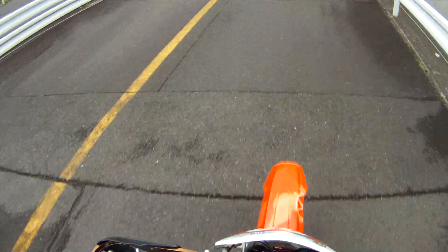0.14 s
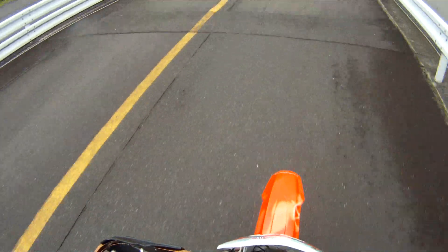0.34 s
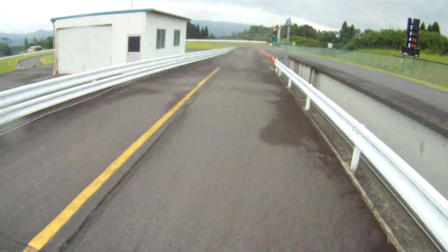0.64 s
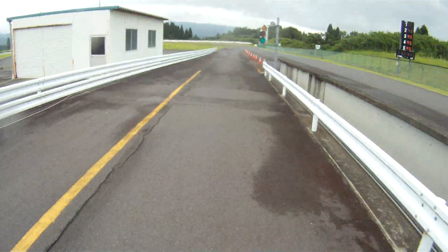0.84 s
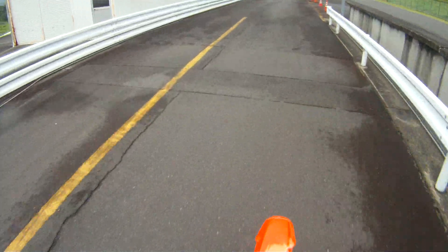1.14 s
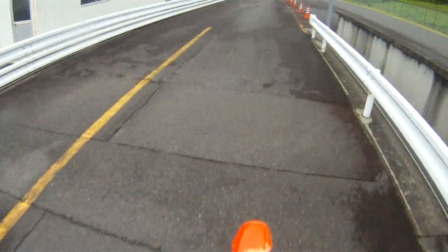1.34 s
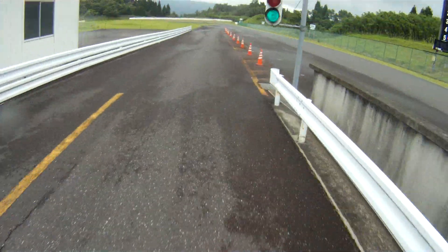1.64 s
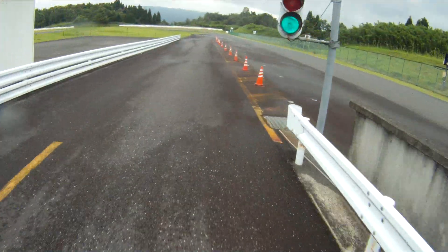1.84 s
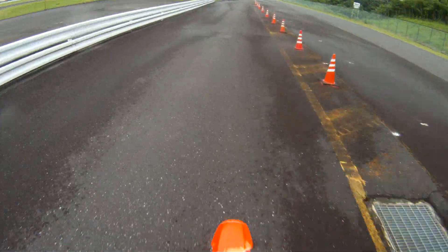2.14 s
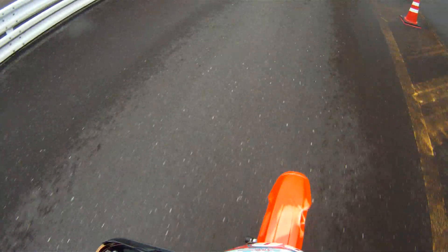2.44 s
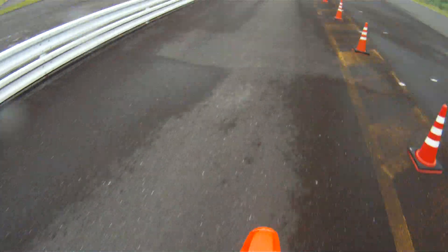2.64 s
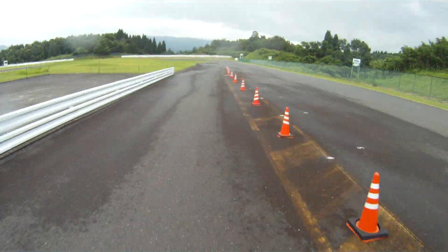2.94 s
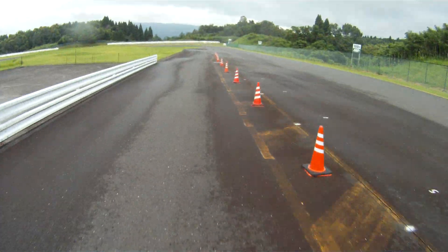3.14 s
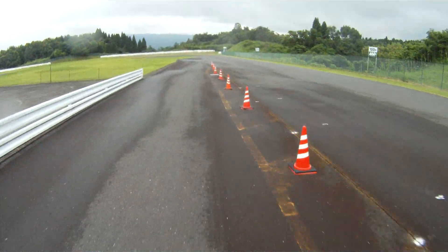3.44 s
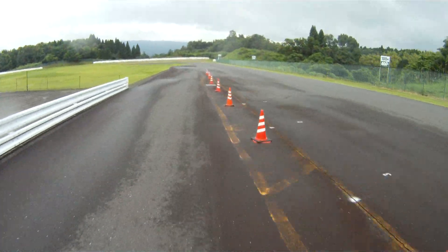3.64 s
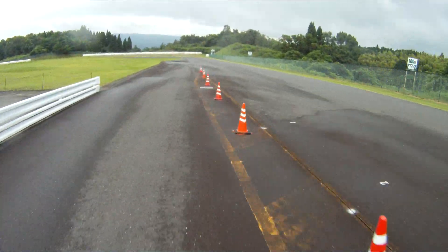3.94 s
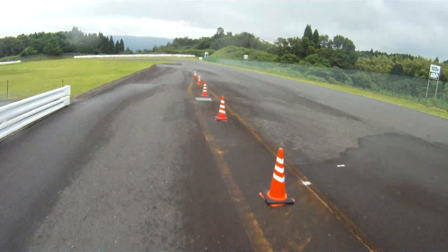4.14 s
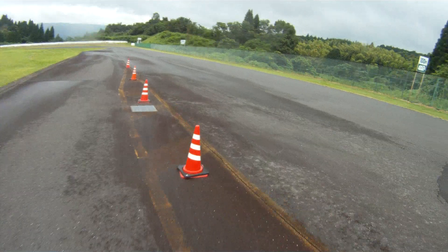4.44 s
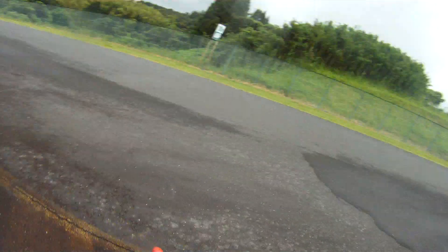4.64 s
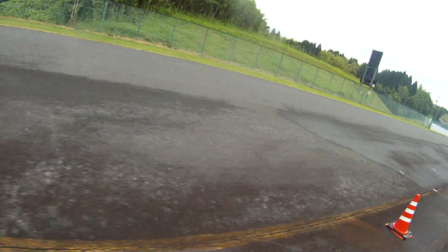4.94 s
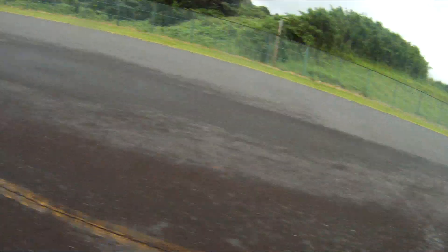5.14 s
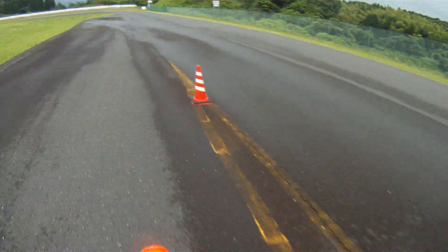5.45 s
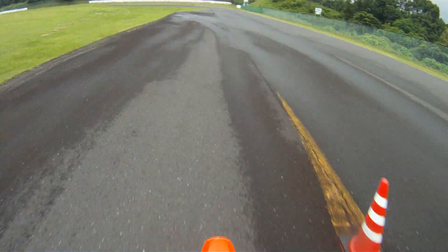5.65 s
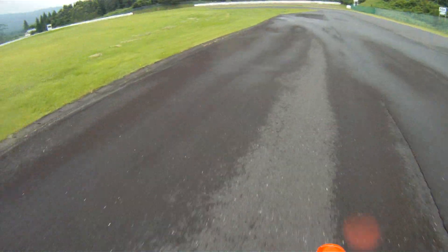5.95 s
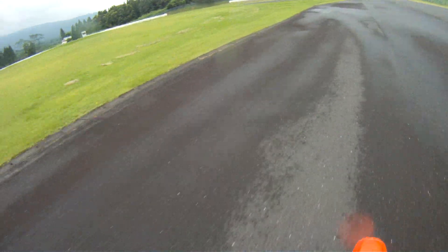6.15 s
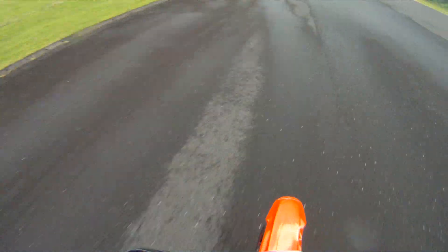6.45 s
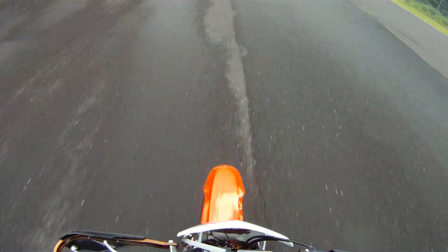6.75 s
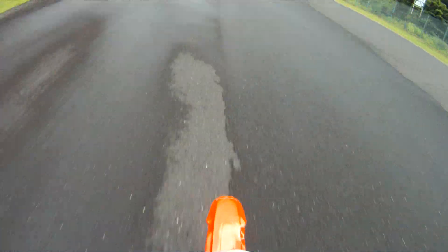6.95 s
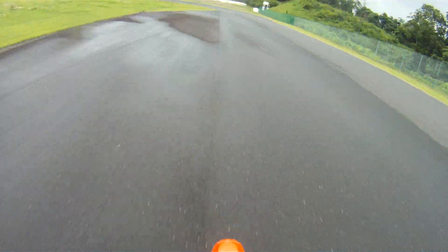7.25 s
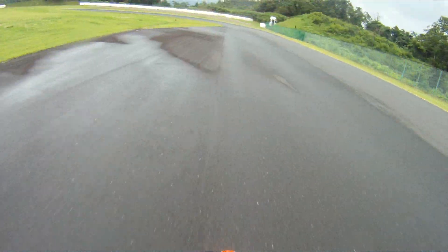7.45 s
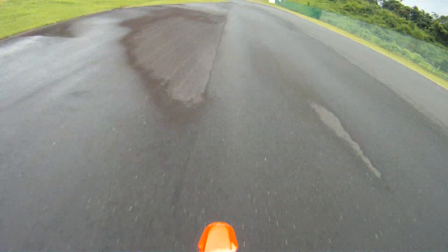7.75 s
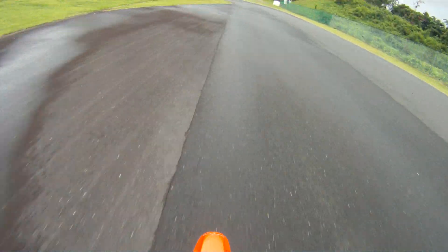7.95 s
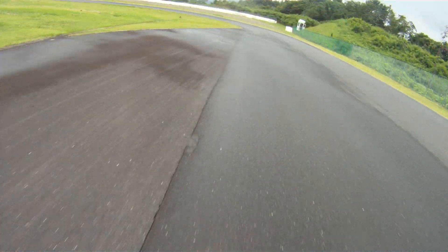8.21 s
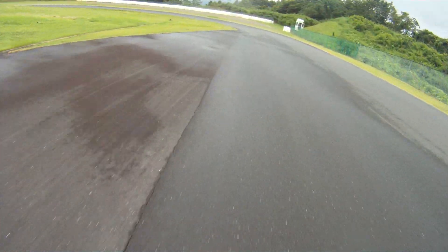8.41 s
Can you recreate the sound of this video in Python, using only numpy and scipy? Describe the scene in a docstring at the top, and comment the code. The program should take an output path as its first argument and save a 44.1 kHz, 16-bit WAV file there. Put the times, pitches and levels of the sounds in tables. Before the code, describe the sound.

A single-cylinder motorcycle pulls out of a pit lane onto a race track, heard from a microphone on the rider's helmet. The exhaust thumps and the engine clatters, rising in pitch, dropping at one upshift, then climbing slowly again. Wind hisses and buffets more loudly as speed grows. Bumps shake the mount with low shudders, and a few sharp plastic knocks hit the microphone, the loudest just past the middle.

```python
"""Pit lane, heard from a helmet camera: a single-cylinder four-stroke motorcycle pulls out, shifts up once.
The exhaust thumps in double puffs; engine clatter and the growing wind ring the camera's plastic case.
Air buffets and moans round the helmet. Bumps shake the mount, and a few sharp knocks on the case
overload the microphone."""
import sys
import numpy as np
from scipy import signal
from scipy.fft import rfft, irfft
from scipy.io import wavfile

SR = 44100
rng = np.random.default_rng(int(sys.argv[2]) if len(sys.argv) > 2 else 0)


def waveform_to_disk(signal):
    """Save audio, clipped to [-1, 1], as 16-bit WAV at the path in sys.argv[1]."""
    frames = np.transpose(np.atleast_2d(signal))
    scaled = np.clip(frames, -1, 1) * 32767
    samples = np.round(scaled).astype(np.int16)
    wavfile.write(sys.argv[1], SR, samples)


N = 378378
TIME = np.arange(N) / SR
HZ = np.fft.rfftfreq(N, 1 / SR)

# Engine speed through two gears. Each row: time in seconds, firing rate in Hz.
FIRING_HZ = [(0.0, 25.37), (0.65, 28.18), (1.3, 30.46), (2.35, 33.24), (2.75, 34.59), (3.68, 36.52),
             (3.8, 34.34), (3.92, 28.81), (4.05, 29.83), (4.4, 30.82), (5.55, 32.77), (6.8, 34.41),
             (7.65, 35.05), (8.58, 35.22)]
# Camera case resonances. Each row: centre in Hz, width in Hz, air-driven dB, engine-driven dB.
CASE_MODES = [(660, 110, -13.5, -13), (838, 39, -7.5, -5.5), (1076, 89, -3.5, 1), (1251, 173, -2.5, -7.5),
              (1500, 236, -3, -11), (2100, 1960, -9, -42), (2267, 358, 0.5, -4), (3080, 83, -8.5, -20),
              (3567, 270, -5.5, -12.5), (3980, 243, -8, -32), (5020, 420, -18.5, -21.5),
              (6970, 550, -20.5, -25.5), (7930, 110, -13.5, -32), (8390, 630, -13, -26),
              (9686, 460, -13, -15), (10690, 370, -21, -20), (13200, 810, -26, -24), (14200, 250, -13, -17),
              (15000, 420, -19, -29)]


def amp(db):
    """Decibels to gain."""
    return 10 ** (np.asarray(db) / 20)


def unit(x):
    """Scale to rms 1."""
    return x / np.sqrt(np.mean(x ** 2) + 1e-20)


def curve(rows):
    """Interpolate (seconds, value) rows at every sample."""
    return np.interp(TIME, *np.transpose(rows))


def add(mix, start_s, sound):
    """Mix a sound in at start_s."""
    part = mix[round(start_s * SR):][:len(sound)]
    part += sound[:len(part)]


def colour(x, gain):
    """Filter by a gain per frequency; rms 1."""
    return unit(irfft(rfft(x) * gain, N))


def noise(gain):
    """Coloured noise; rms 1."""
    return colour(rng.standard_normal(N), gain)


def drift(hz):
    """Random wander up to a rate; rms 1."""
    return noise(1 / (1 + (HZ / hz) ** 4))


def peaks(modes):
    """Gain per frequency of steep-sided resonances (Hz, width Hz, dB)."""
    gains = (amp(db) / (1 + (1.29 * (HZ - hz) / width_hz) ** 2) for hz, width_hz, db in modes)
    return np.sqrt(sum(gain ** 2 for gain in gains))


def ring(drive, modes):
    """Ring pipe modes (Hz, width Hz, dB), neighbours in opposite phase; rms 1."""
    t = TIME[:4000]
    response = sum((-1) ** k * amp(db) * width * np.exp(-np.pi * width * t) * np.cos(2 * np.pi * hz * t)
                   for k, (hz, width, db) in enumerate(modes))
    return unit(signal.oaconvolve(drive, response)[:N])


def pulses(cycles):
    """One impulse per whole cycle, split between the two nearest samples."""
    whole = np.floor(cycles)
    at = np.flatnonzero(np.diff(whole))
    late = (whole[at + 1] - cycles[at]) / (cycles[at + 1] - cycles[at])
    out = np.zeros(N)
    out[at], out[at + 1] = 1 - late, late
    return out


def road_speed(engage_s=3.92, gear_step=1.27):
    """Share of top speed: follows the revs through the gearing, coasts during the shift."""
    speed = np.maximum.accumulate(curve(FIRING_HZ) * np.where(TIME > engage_s, gear_step, 1))
    return speed / speed[-1]


def gusts():
    """Bell-shaped gusts on the helmet: extra dB of roar, hiss, buffet and moan."""
    # Each row: centre and length in seconds, then dB of roar, hiss, buffet, moan.
    swells = [(3.833, 0.097, 1.5, 1.5, 6, 2), (4.662, 0.1, -1.5, 1.5, -2, 2), (4.8, 0.16, -3, 0, 5, 0),
              (5.176, .2, 3, 4.5, 7.5, 1), (5.28, .12, -3.5, 1.5, 9.5, 0), (5.55, .1, -0.5, 0.5, 7, 0),
              (6.067, 0.2, 1, 4, -4, 1), (6.45, 0.54, 1, 2.5, 1, 1), (8.152, 0.16, -1.5, -0.5, -3, 6)]
    return sum(np.outer(extra_db, np.exp(-(2 * (TIME - centre_s) / length_s) ** 2))
               for centre_s, length_s, *extra_db in swells)


def helmet(buffet_hz=133, buffet_width_hz=65, moan_onset=0.91):
    """Air round the helmet: low buffeting grows with speed, a hollow moan swells near top speed."""
    # Each row: centre in Hz, width in Hz, relative level in dB.
    moan_modes = [(519, 64, 8), (603, 29, 12.5)]
    speed = road_speed()
    _, _, buffet_gust_db, moan_gust_db = gusts()
    buffet_db = -34.5 + 10 * np.log2(speed) + buffet_gust_db
    moan_db = np.interp(speed, [moan_onset, 1], [-43, -33.5]) + moan_gust_db
    buffet = amp(buffet_db) * noise(peaks([(buffet_hz, buffet_width_hz, 0)]))
    return buffet + amp(moan_db) * noise(peaks(moan_modes))


def whistles():
    """Air over an edge of the case: brief swells of narrow-band noise."""
    # Each row: centre and length in seconds, level in dB, pitch and width in Hz.
    bands = [(5.167, .2, -29, 1250, 200), (6.06, 0.17, -30, 3930, 160)]
    return sum(amp(db) * np.exp(-(2 * (TIME - centre_s) / length_s) ** 2) * noise(peaks([(hz, width, 0)]))
               for centre_s, length_s, db, hz, width in bands)


def wind(split_hz=2800, low_cut_hz=600, flutter_db=0.54, crackle_db=-0.86, fizz_db=1.5):
    """Turbulent air excites the case, louder with speed; eddies make it flutter and crackle."""
    # Slow swell; sinks as the rider looks aside. Each row: time in seconds, level offset in dB.
    exposure = [(0, -0.5), (1.1, 1), (2.3, -1), (2.72, -4.5), (3.0, 0), (3.3, -2), (4.5, 0), (4.9, -1.5),
                (5.42, -3.5), (5.62, -1), (6.95, -1.1), (7.7, 1.4), (8.58, 0)]
    speed_octaves, exposure_db = np.log2(road_speed()), curve(exposure)
    roar_gust_db, hiss_gust_db, _, _ = gusts()
    roar_db = -20.5 + 17.5 * speed_octaves + exposure_db + roar_gust_db
    hiss_db = -24 + 19 * speed_octaves + exposure_db + hiss_gust_db
    case = peaks([(hz, width, db) for hz, width, db, _ in CASE_MODES])
    case /= np.sqrt(1 + (low_cut_hz / (HZ + 1)) ** 6)
    low_share = 1 / (1 + (HZ / split_hz) ** 16)
    eddies_db = flutter_db * drift(30)
    roar_drive = rng.standard_normal(N) * amp(eddies_db + crackle_db * drift(500))
    hiss_drive = rng.standard_normal(N) * amp(eddies_db + fizz_db * drift(630))
    roar = amp(roar_db) * colour(roar_drive, case * np.sqrt(low_share))
    hiss = amp(hiss_db) * colour(hiss_drive, case * np.sqrt(1 - low_share))
    return roar + hiss


def mount(start_db=-39, end_db=-32.5, rise_s=0.007):
    """The mount shudders steadily more as the ride goes on, and swings at each bump in the track."""
    # Shudder spectrum. Each row: frequency in Hz, relative density in dB.
    shudder = [(8, -26), (22, -12), (33, 0), (45, -10), (65, -14), (100, -18), (200, -20), (300, -22),
               (450, -26), (700, -38), (1500, -70)]
    # Each row: start in seconds, level in dB, swing in Hz, t60 in seconds.
    bumps = [(.745, -20.5, 33.3, 0.51), (2.5, -26, 34.4, 0.89), (2.92, -22, 33.6, .4),
             (4.701, -21, 34.5, 0.98), (4.974, -7, 42, 0.39), (5.95, -24, 79, 0.37),
             (5.998, -15, 35.3, 0.56), (6.95, -19, 36.6, 0.57), (8.2, -22, 34.7, 0.49)]
    knots_hz, knots_db = np.transpose(shudder)
    spectrum = amp(np.interp(np.log(HZ + 1), np.log(knots_hz), knots_db))
    out = noise(spectrum) * amp(np.linspace(start_db, end_db, N))
    t = TIME[:SR // 2]
    for start_s, db, hz, t60_s in bumps:
        envelope = amp(db - 60 * t / t60_s) * (1 - np.exp(-t / rise_s))
        add(out, start_s, envelope * np.sin(2 * np.pi * hz * t))
    return out


def knocks(rise_s=0.0005, tick_hz=10000):
    """Hard knocks ring the plastic case for milliseconds, with a thin tick on top."""
    # Each row: start in seconds, level in dB, ring in Hz, t60 in seconds, tick in dB re the ring.
    hits = [(.732, -10.5, 1070, .014, -25), (2.4868, 3, 2150, .014, -10), (4.9228, 2, 2200, .011, -14),
            (4.9625, 9, 2550, .012, -11)]
    # Each row: multiple of the ring frequency, relative level in dB.
    knock_modes = [(.39, -8.5), (.52, -4.5), (.7, -9), (.88, -4), (1, -0.5), (1.1, -19)]
    out, t = np.zeros(N), TIME[:1500]
    tick = np.sin(2 * np.pi * tick_hz * t) + 0.5 * np.sin(2 * np.pi * 1.4 * tick_hz * t)
    for start_s, db, hz, t60_s, tick_db in hits:
        body = sum(amp(mode_db) * np.sin(2 * np.pi * hz * ratio * t) for ratio, mode_db in knock_modes)
        envelope = amp(db - 60 * t / t60_s) * (1 - np.exp(-t / rise_s))
        add(out, start_s, envelope * (body + amp(tick_db) * tick))
    return out


def clatter(cycles, start_db=-33, db_per_octave=3, ticks_per_s=1500, tick_db=-3, valve_db=-11,
            throb_db=3.4, rattle_s=0.0012):
    """Chain ticks, closing valves and fine hiss ring the case: hardest after firing, louder with revs."""
    tick_sizes = amp(2 * np.minimum(rng.exponential(1, N), 4)) * rng.choice([-1, 1], N)
    ticks = unit(tick_sizes * (rng.random(N) < ticks_per_s / SR))
    throb = amp(throb_db * np.cos(2 * np.pi * (cycles - 0.3)))
    drive = unit((rng.standard_normal(N) + amp(tick_db) * ticks) * throb)
    # each valve rattles briefly on its seat
    closings = pulses(cycles - 0.25) + 0.5 * pulses(cycles - 0.75)
    rattle = signal.lfilter([1], [1, -np.exp(-1 / (rattle_s * SR))], closings)
    valves = unit(rattle * rng.standard_normal(N) * amp(3 * drift(40)))
    case = peaks([(hz, width, db) for hz, width, _, db in CASE_MODES])
    rev_octaves = np.log2(curve(FIRING_HZ) / FIRING_HZ[0][1])
    return amp(start_db + db_per_octave * rev_octaves) * colour(drive + amp(valve_db) * valves, case)


def gear_shift(start_s=3.715, length_s=0.15, move_s=0.015):
    """The throttle shuts briefly for the shift: 0 while pulling, 1 while shut."""
    return np.clip(np.minimum(TIME - start_s, start_s + length_s - TIME) / move_s, 0, 1)


def exhaust(cycles, second_lag_cycles=0.19, second_db=-6, uneven_db=-0.76, jitter_cycles=0.00088,
            soft_hz=520, shut_depth=0.65, lug_hz=28.3, lug_span_hz=1.2, rasp_db=-17,
            pop_lag_cycles=0.216, pop_db=-29.5, crank_db=-37.5):
    """Blow-down and a softer second puff ring the silencer; throttle shut, blow-down fades, pipe pops."""
    # Engine load. Each row: time in seconds, exhaust level in dB.
    load = [(0, -34), (2.3, -30.3), (3.2, -32), (3.95, -30), (4.3, -29.5), (6.5, -31.5), (8.58, -31.5)]
    # Silencer and hollow pipe resonances. Each row: centre in Hz, width in Hz, relative level in dB.
    silencer_modes = [(127, 33, -1.5), (183, 92, 2.5), (223.2, 94, -1), (377, 72, -6.5), (454, 115, -7.5)]
    pop_modes = [(140, 100, 3), (239, 92, -1)]
    shut = gear_shift()
    throttle = 1 - shut_depth * shut
    cycles = cycles + jitter_cycles * drift(23)
    blow_down = throttle * pulses(cycles)
    second_puff = (amp(second_db) * throttle + 1 - throttle) * pulses(cycles - second_lag_cycles)
    puffs = (blow_down + second_puff) * amp(uneven_db * drift(99))
    # the valve opens smoothly, so the puffs are dull
    puffs = signal.sosfilt(signal.butter(3, soft_hz, fs=SR, output="sos"), puffs)
    # turbulent gas rasps while the valve is open
    rasp = unit(noise(peaks([(357, 390, 0)])) * np.exp(0.28 * np.cos(2 * np.pi * (cycles - 0.26))))
    # the pipe booms most while the engine lugs at low revs
    lugging = np.clip((lug_hz - curve(FIRING_HZ)) / lug_span_hz, 0, 1)
    boom = amp(-11 + 7.5 * lugging) * ring(puffs, [(269, 39, 0)])
    pipe = amp(curve(load)) * (ring(puffs, silencer_modes) + boom + amp(rasp_db) * rasp)
    pops = amp(pop_db) * shut * ring(pulses(cycles - pop_lag_cycles), pop_modes)
    # the crank shakes the air twice per firing
    crank = amp(crank_db) * unit(-np.cos(2 * np.pi * 2 * cycles))
    return pipe + pops + crank


def scene():
    """Engine, air, mount and knocks at the camera; mono."""
    cycles = 0.56 + np.cumsum(curve(FIRING_HZ)) / SR  # one per firing
    engine = exhaust(cycles) + clatter(cycles)
    air = wind() + whistles() + helmet()
    return (engine + air + mount() + knocks())[None]


def record(dry, threshold_db=-9, recovery_db_per_s=55, edge_hz=15400):
    """Gain control ducks just after each overload, too late to stop clipping; then the band limit."""
    power = signal.lfilter(np.ones(128) / 128, 1, dry[0] ** 2)
    fall_db = TIME * recovery_db_per_s
    held_db = np.maximum.accumulate(10 * np.log10(power + 1e-12) + fall_db) - fall_db
    over_db = np.maximum(held_db - threshold_db, 0)
    duck_db = 0.7 * signal.lfilter(np.hanning(600) / 300, 1, over_db)
    clipped = np.clip(dry * amp(-duck_db), -1, 1)
    low_pass = signal.firwin(511, edge_hz, window=("kaiser", 9), fs=SR)
    return signal.oaconvolve(clipped, low_pass[None], "same")


dry = scene()
out = record(dry)
waveform_to_disk(out)
```